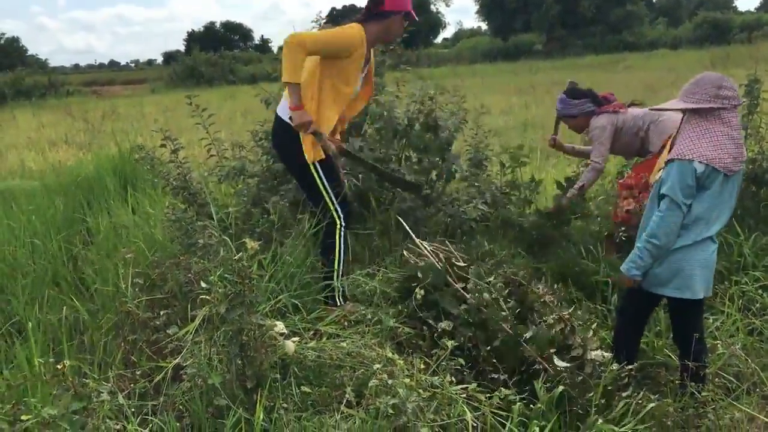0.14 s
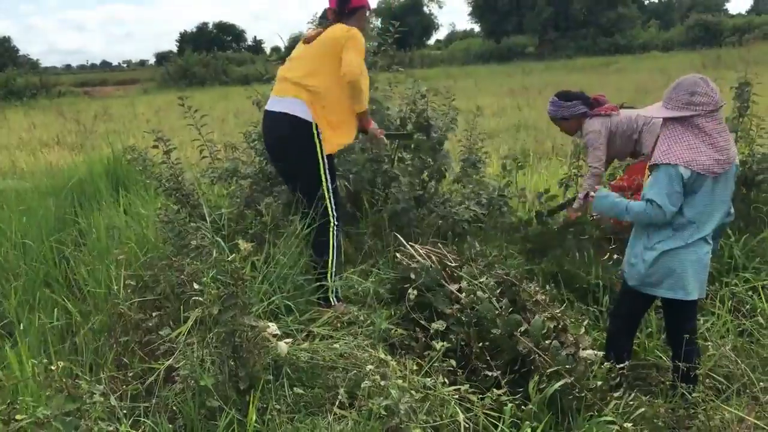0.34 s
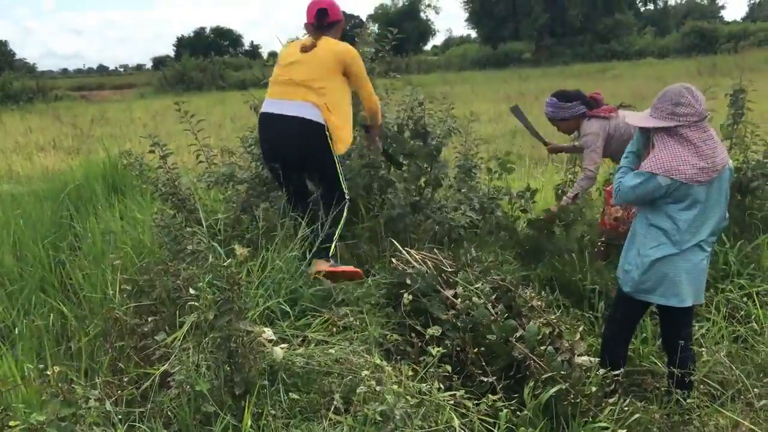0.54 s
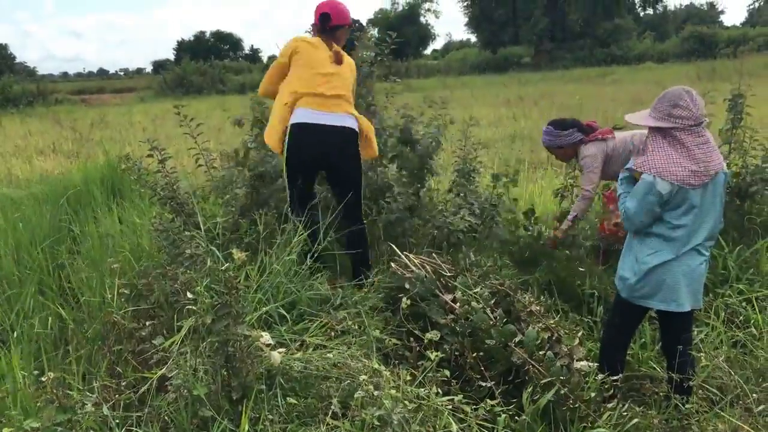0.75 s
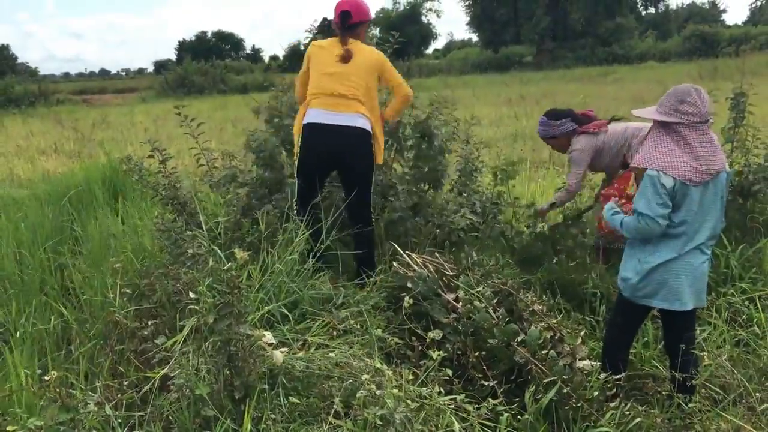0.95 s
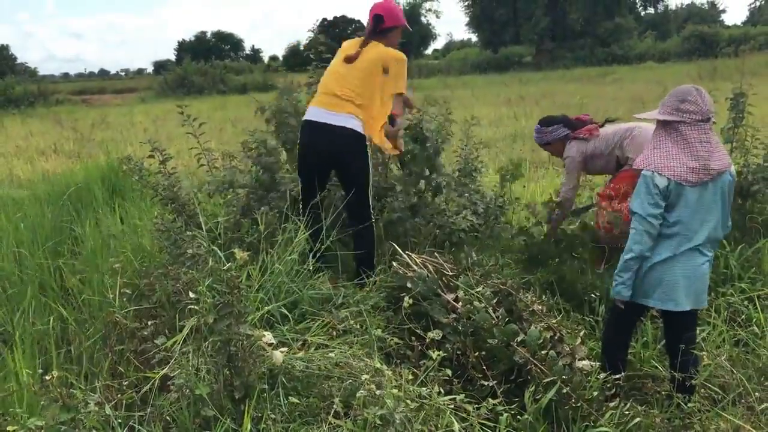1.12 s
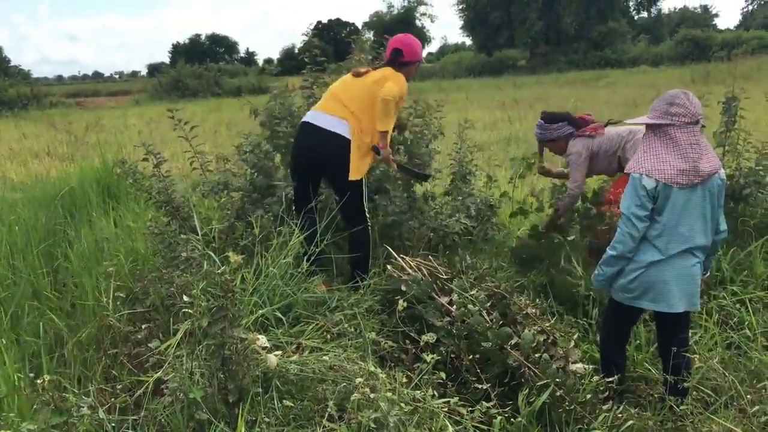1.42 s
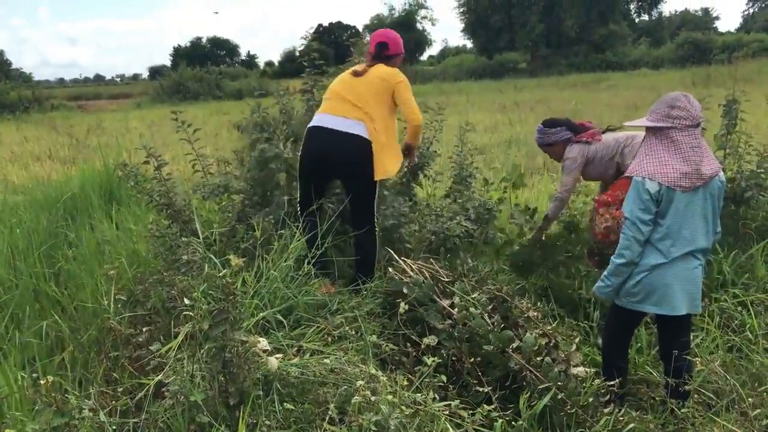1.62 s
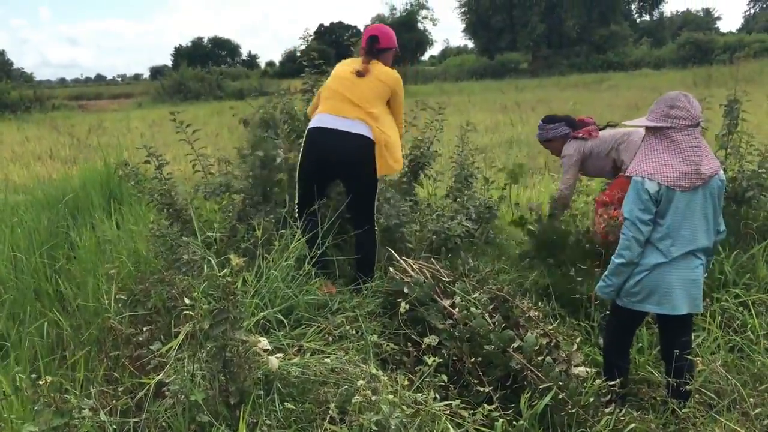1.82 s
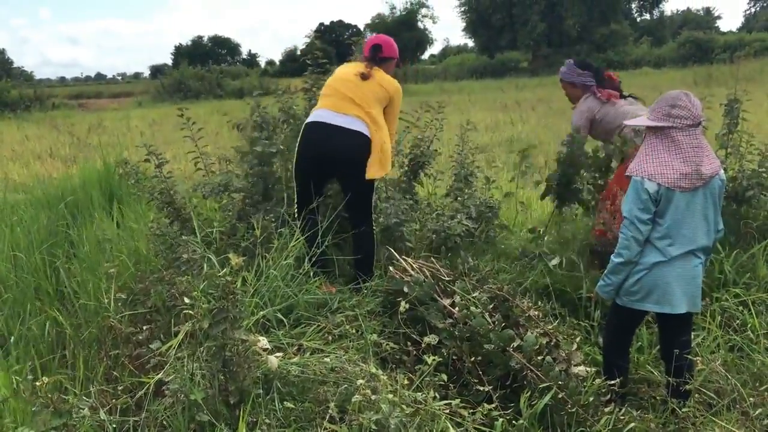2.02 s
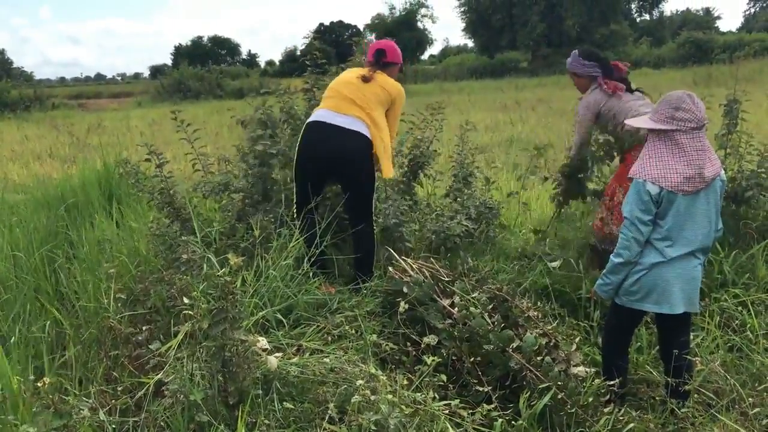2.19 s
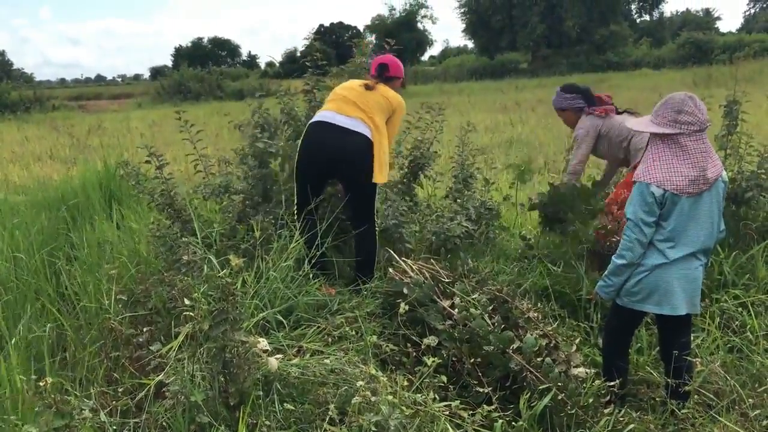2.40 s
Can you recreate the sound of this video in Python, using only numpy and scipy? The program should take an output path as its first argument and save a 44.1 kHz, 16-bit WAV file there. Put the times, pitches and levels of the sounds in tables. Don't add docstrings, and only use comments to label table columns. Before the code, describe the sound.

Sharp woody cracks and gritty fibre tearing break from a shrub, followed by soft leaf rustle and a brief steel clink and muted chop. Close, dry outdoor sound with faint chirps, insects and wind buffeting the microphone.

```python
import sys
import numpy as np
from scipy import signal
from scipy.fft import rfft, irfft
from scipy.io import wavfile
from scipy.ndimage import uniform_filter1d

SR = 44100
rng = np.random.default_rng(int(sys.argv[2]) if len(sys.argv) > 2 else 0)


def undo_db(level):
    steps = np.asarray(level, float) / 20
    return 10 ** steps


def generate_wav(signal):
    frames = np.transpose(np.atleast_2d(signal))
    scaled = np.clip(frames, -1, 1) * 32767
    pcm = np.round(scaled).astype(np.int16)
    wavfile.write(sys.argv[1], SR, pcm)


N = 112454


def colour(x, points, tilt_db=0):
    shape_hz, shape_db = np.transpose(points)
    hz = np.maximum(np.arange(4097) * SR / 8192, 5)
    db = np.interp(np.log(hz), np.log(shape_hz), shape_db) + tilt_db * np.log2(hz / 3000)
    cepstrum = irfft(db * np.log(10) / 20)
    cepstrum[1:4096] *= 2
    cepstrum[4097:] = 0
    y = signal.fftconvolve(x, irfft(np.exp(rfft(cepstrum))))[:len(x)]
    return y / np.sqrt(np.mean(y ** 2))


def curve(points):
    seconds, db = np.transpose(points)
    return undo_db(np.interp(np.arange(N) / SR, seconds, db))


def walk(rate):
    hold = int(SR / rate)
    steps = np.repeat(rng.standard_normal(N // hold + 1), hold)
    return 1.3 * uniform_filter1d(uniform_filter1d(steps, hold), hold)[:N]


def grains(share, spread_db):
    chance, sign, size = rng.random((3, N))
    return (chance < share) * np.sign(sign - .5) * undo_db(-spread_db * np.log(size + 1e-4))


def decay(t, t60):
    return (t >= 0) * np.exp(-np.log(1000) * np.maximum(t, 0) / t60)


def bump(t, half):
    return np.exp(-(t / half) ** 2)


def gate(t, length, edge):
    return np.clip(t / edge + .5, 0, 1) * np.clip((length - t) / edge + .5, 0, 1)


# time in seconds, level in dB.
GUST_LEVEL = [(0.0, -51), (0.08, -51), (0.51, -53), (1.17, -54.5), (1.58, -53), (1.67, -54.5),
              (2.06, -50.5), (2.16, -53), (2.42, -54.5), (2.55, -54.5)]
# frequency in Hz, level in dB.
RUMBLE_COLOUR = [(20, -16), (49, -0.5), (70, 0.5), (107, -6.5), (175, -8), (250, -21), (400, -33),
                 (520, -71), (880, -120)]
# centre in seconds, peak in dB, pitch in Hz, half length in seconds.
BUFFETS = [(.425, -42.5, 62, 0.013), (1.1, -43, 80, .015), (2.7, -46, 91, .012), (1.8, -44.5, 65, .012),
           (1.559, -42.5, 68, .012), (1.983, -42, 170, 0.003), (2.135, -52, 320, .008), (.26, -46, 60, .03),
           (.9, -47, 80, .015), (2.076, -40, 62, 0.014), (2.097, -38, 79, 0.007), (2.149, -31, 64, 0.0096),
           (2.139, -34, 148, 0.0053)]


def wind(t):
    noise = colour(rng.standard_normal(N), RUMBLE_COLOUR + [(700, -61.0)])
    rumble = noise * curve(GUST_LEVEL) * undo_db(1.0 * walk(15.4))
    thumps = sum(undo_db(db) * bump(t - s, half) * np.sin(-2 * np.pi * hz * (t - s))
                 for s, db, hz, half in BUFFETS)
    return rumble + thumps


# frequency in Hz, level in dB.
FIELD_COLOUR = [(180, -25), (300, -5), (814, -5), (1230, -5.5), (2740, -8.5), (7820, -12.5), (16000, -17.5)]


def field():
    return undo_db(-63.5) * colour(rng.standard_normal(N), FIELD_COLOUR)


# time in seconds, level in dB.
PULL_LEVEL = [(0, -53.5), (.12, -68.5), (.15, -55.5), (.19, -55), (.26, -59.5), (.64, -78.5), (.69, -60),
              (.80, -53), (.95, -66), (1.18, -68), (1.35, -58), (1.5, -79), (1.62, -60), (1.66, -63),
              (1.96, -60), (2.1, -62), (2.19, -60), (2.22, -68)]
# centre in seconds, level in dB, half length in seconds.
WHIPS = [(.678, -62, .006), (.7, -64, .015), (.77, -60, .008), (.803, -59, .01), (1.31, -60, .025),
         (1.346, -58, .003), (1.925, -61, .015), (2.03, -63, .03), (1.87, -64, .015), (1.96, -60, .03),
         (2.147, -59, .015), (2.185, -63, .008)]
# frequency in Hz, level in dB.
LEAF_COLOUR = [(290, -41.5), (500, -12), (2690, -5.5), (5970, -3), (9500, -7), (11000, -11), (16000, -13.5)]


def leaves(t):
    def patch(tilt_db):
        rustle = colour(grains(.5, 2.63), LEAF_COLOUR, tilt_db)
        return rustle * undo_db(1.3 * walk(45.22) + 1.5 * walk(150))

    pull = curve(PULL_LEVEL)
    whips = sum(undo_db(db) * bump(t - s, half) for s, db, half in WHIPS)
    dull = patch(-2.12) * (pull + .4 * whips)
    bright = patch(2.45) * (pull + 1.5 * whips)
    return 0.73 * (dull + bright)


# start, peak and end, all in seconds.
TEARS = [(.113, .115, .124), (.1415, .144, .152), (.205, .232, .242), (.326, .329, .337),
         (.333, .339, .343), (.685, .7, .72), (.7445, .746, .757), (.834, .836, .841), (.839, .842, .851),
         (.848, .853, .859), (1.4155, 1.417, 1.421), (1.6375, 1.642, 1.6455), (1.704, 1.708, 1.712)]
# level in dB, tilt in dB per octave.
TEAR_TONE = [(-61, -4.5), (-46.5, -4.5), (-43, 5), (-40.5, 4.5), (-27.5, -0.5), (-52, 4), (-49.5, 3),
             (-39, 0.5), (-32, 3), (-36, 3), (-46, -5), (-33, 1.5), (-57, 3)]
# frequency in Hz, level in dB.
STEM_COLOUR = [(180, -41), (300, -18), (994, -1), (2520, -1), (4910, 1), (5700, -1), (9500, -4),
               (16000, -13)]


def tearing_fibres(t):
    lead_s, stop_s = .002, .0046
    rise_db, sag_db = 9.5, 10
    shake_db, shake_t60_s = -16.5, 0.24
    ticks = grains(.6, 1.5)
    dull = colour(ticks, STEM_COLOUR, -1.4)
    bright = colour(ticks, STEM_COLOUR, 1.4)
    y = np.zeros(N)
    for (start, peak, end), (db, tilt) in zip(TEARS, TEAR_TONE):
        times = [start - lead_s, start, peak, end, end + stop_s]
        burst = undo_db(np.interp(t, times, [-60, -rise_db, 0, -sag_db, -60]))
        burst = burst * (t > times[0]) * (t < times[-1])
        shake = undo_db(shake_db) * decay(t - peak, shake_t60_s)
        mix = np.clip(.5 + tilt / 6, 0, 1)
        y += undo_db(db) * (burst + shake) * (mix * bright + (1 - mix) * dull)
    return y * undo_db(2.47 * walk(500))


# start in seconds, peak in dB, ring in Hz, 60 dB decay in seconds.
MORE_CRACKS = [(.115, -50, 1500, .015), (.116, -53, 3500, .035), (1.3658, -40, 5600, .009),
               (1.3658, -38, 4300, .009), (1.3658, -43, 3300, .01), (1.3985, -44, 7800, .009),
               (1.3985, -47, 11500, .005), (1.3985, -48, 14500, .005), (1.3658, -51, 10000, .005),
               (1.3985, -45, 4100, .012), (1.3985, -48, 1950, .012), (1.416, -38, 2900, .006),
               (1.416, -39, 1500, .008)]
# start in seconds, peak in dB, ring in Hz, 60 dB decay in seconds.
CRACKS = [(0.1436, -39, 1190, 0.013), (0.1435, -31.5, 3500, 0.0037), (0.151, -46, 7000, 0.0037),
          (0.2241, -40, 4370, .01), (0.24, -42, 4260, .008), (.337, -38, 250, .03),
          (.3388, -17, 8300, .004), (.339, -17, 4300, .005), (.843, -38, 310, .03), (.8413, -32, 8600, .01),
          (.853, -36, 8700, .01), (.3272, -35, 2020, 0.011), (.329, -31, 5700, .009),
          (.3345, -30, 3950, .008), (.3369, -20.5, 3500, 0.0053), (0.3371, -22.5, 1346, .012),
          (.3381, -15, 2800, .002), (0.3387, -6, 5830, 0.0029), (0.3393, -18, 1000, 0.014),
          (0.3395, -26.5, 2010, 0.008), (0.3423, -26, 4100, 0.012), (.342, -32, 5870, .015),
          (.1436, -37, 2180, 0.0069), (.211, -46, 1600, .008), (.752, -47.5, 1490, 0.0097),
          (.745, -46, 5870, .03), (.745, -46, 3430, .01), (0.8411, -17, 3790, 0.0057),
          (0.841, -27, 5700, 0.021), (0.8417, -29, 1544, 0.017), (.843, -33.5, 690, 0.024),
          (0.848, -29, 1660, 0.014), (.849, -21, 4340, 0.0046), (0.85, -36, 160, 0.05),
          (1.6448, -43, 4500, 0.0017)]


def cracking_stems(t):
    y = np.zeros(N)
    for s, db, hz, t60 in CRACKS + MORE_CRACKS:
        u = t - s
        onset = np.clip(u * hz, 0, 1)
        y += undo_db(db) * decay(u, t60) * onset * np.sin(2 * np.pi * hz * u)
    return y


# centre in seconds, centre pitch in Hz, level in dB.
CHIRPS = [(.169, 5850, -53), (.73, 5600, -57), (.698, 5620, -57), (.483, 5600, -63), (1.1, 6000, -62),
          (0.433, 5570, -55), (0.465, 5650, -54), (0.481, 6100, -62), (.512, 6100, -53.5),
          (0.802, 5950, -50), (1.003, 5680, -54), (1.044, 5700, -54), (1.119, 6000, -52.5),
          (1.159, 5980, -54), (1.26, 5440, -56), (1.293, 5700, -52.5), (1.412, 6000, -56),
          (1.441, 5940, -54.5), (1.478, 5870, -59), (1.547, 5700, -56.5), (1.574, 5700, -56),
          (1.601, 5770, -53)]
# centre in seconds, centre pitch in Hz, level in dB.
LATE_CHIRPS = [(1.759, 5930, -54), (1.799, 5930, -52), (1.842, 5620, -52.5), (1.866, 5680, -51.5),
               (2.083, 5650, -50), (2.089, 6050, -53.5), (2.113, 5730, -50.5), (2.127, 5600, -52),
               (2.345, 5980, -52.5), (2.362, 5660, -52), (2.368, 6050, -51.5), (2.393, 5720, -53.5),
               (2.403, 5620, -54)]


def chirping_birds(t):
    y = np.zeros(N)
    for s, hz, db in CHIRPS + LATE_CHIRPS:
        fall_hz = 450 + 1.1 * (hz - 5600)
        long_s = 0.017 * (0.88 + 0.05 * fall_hz / 800)
        u = t - s
        swell = np.cos(np.pi * np.clip(u / long_s, -.5, .5))
        cycles = hz * u - fall_hz / long_s * u ** 2 / 2
        y += undo_db(db) * swell * np.sin(2 * np.pi * cycles)
    return y


# start in seconds, length in seconds, pitch in Hz, level in dB.
HELD_NOTES = [(1.442, 0.034, 4700, -57), (1.505, 0.022, 4740, -53), (1.53, 0.024, 4700, -62),
              (1.561, 0.068, 4690, -65), (2.328, 0.033, 4720, -65), (.55, 0.013, 11000, -68),
              (0.622, .015, 8000, -67), (.481, .013, 9200, -70), (0.65, .012, 7560, -70),
              (.63, 0.02, 6000, -67), (0.81, .02, 4800, -65), (2.235, .025, 800, -69),
              (2.225, .035, 980, -69), (1.748, 0.038, 630, -64.5), (2.472, .015, 7960, -68),
              (1.487, 0.011, 4730, -65), (0.45, 0.24, 1246, -71), (1.023, .1, 1234, -69.5),
              (1.748, 0.036, 1257, -65.5)]


def insects_and_far_bird(t):
    y = np.zeros(N)
    for s, length, hz, db in HELD_NOTES:
        cycles = np.cumsum(hz + 14 * walk(77)) / SR
        y += undo_db(db + 1.1 * walk(80.5)) * gate(t - s, length, .005) * np.sin(2 * np.pi * cycles)
    return y


# pitch in Hz, level in dB, 60 dB decay in seconds.
GRAZE_MODES = [(1860, -55, 0.1), (3500, -52, 0.35), (8600, -58, .08), (4440, -53, 0.11), (5420, -54.5, .14),
               (5900, -58.5, 0.65)]
# pitch in Hz, level in dB.
BITE_MODES = [(1157, -53), (1846, -45.5), (2860, -48.5), (3500, -36), (3920, -53), (5855, -38.5)]


def blade(t):
    graze_s, bite_s, bite_end_s = 1.417, 1.609, 1.628
    rise_s, fall_s = .005, .0022

    def tone(hz):
        return np.sin(2 * np.pi * hz * t + 6 * rng.random())

    y = np.zeros(N)
    for hz, db, t60 in GRAZE_MODES:
        y += undo_db(db + 1.1 * walk(60.6)) * decay(t - graze_s, t60) * tone(hz)
    rise = np.exp(np.minimum(t - bite_s - rise_s, 0) / rise_s * 2)
    hold = rise * np.exp(-np.maximum(t - bite_end_s, 0) / fall_s)
    for hz, db in BITE_MODES:
        sharpness = (hz / 3500) ** .6
        y += undo_db(db + 1.0 * walk(180)) * hold ** sharpness * tone(hz)
    rebound = undo_db(-35) * gate(t - 1.638, 0.0054, 0.0012) + undo_db(-42) * gate(t - 1.632, 0.0068, 0.0046)
    return y + rebound * tone(BITE_MODES[3][0])


def scene():
    t = np.arange(N) / SR
    brush = leaves(t) + tearing_fibres(t) + cracking_stems(t)
    animals = chirping_birds(t) + insects_and_far_bird(t)
    return (wind(t) + field() + brush + animals + blade(t))[None]


def top_cut(x):
    return signal.sosfilt(signal.butter(12, 16650, fs=SR, output="sos"), x)


# centre in Hz, width in Hz, depth from 0 to 1.
DIPS = [(498, 98, 0.32), (2723, 475, 0.59), (4905, 420, 0.6), (10400, 280, 0.9)]


def record(dry):
    for hz, width_hz, depth in DIPS:
        peak = signal.lfilter(*signal.iirpeak(hz, hz / width_hz, fs=SR), dry)
        dry = dry - depth * peak
    low_pass = signal.ellip(8, .2, 70, 15750, fs=SR, output="sos")
    return top_cut(signal.sosfilt(low_pass, dry))


dry = scene()
out = record(dry)
generate_wav(out)
```